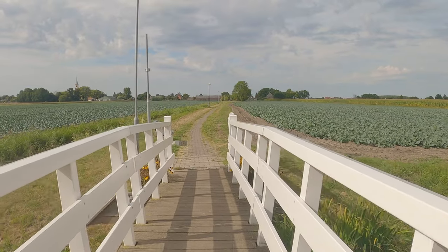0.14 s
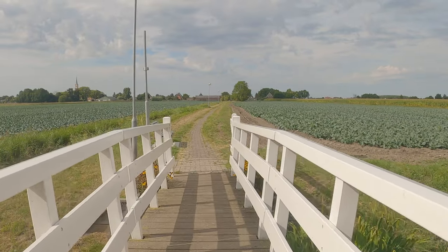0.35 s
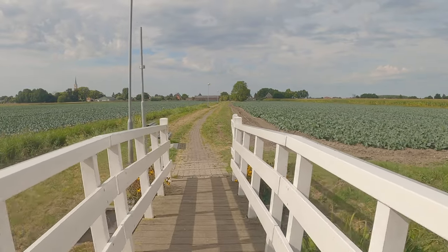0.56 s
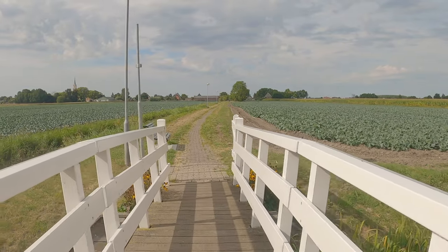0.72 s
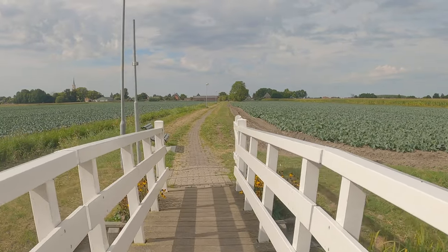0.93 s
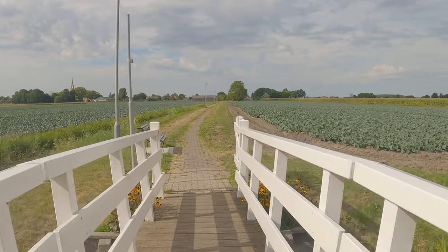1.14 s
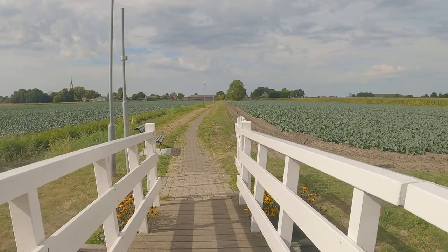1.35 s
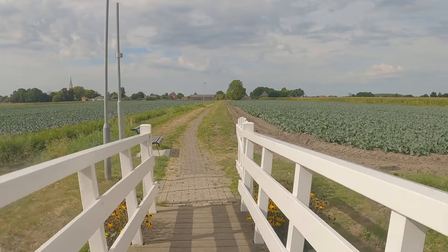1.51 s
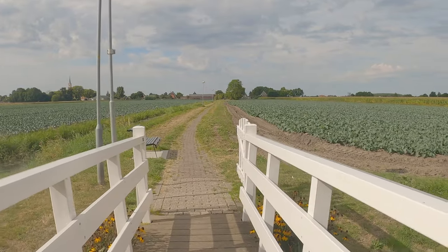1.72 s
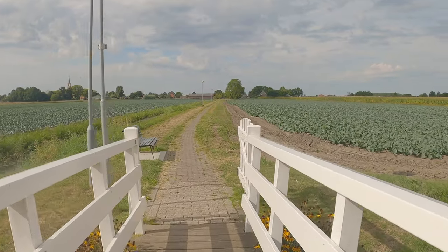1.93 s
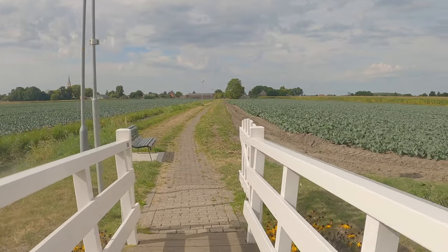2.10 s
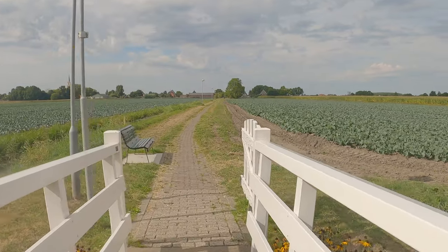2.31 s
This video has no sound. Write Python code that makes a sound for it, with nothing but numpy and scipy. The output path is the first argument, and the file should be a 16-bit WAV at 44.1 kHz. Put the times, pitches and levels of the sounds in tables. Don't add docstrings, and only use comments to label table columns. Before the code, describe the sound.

Close stereo microphone on a cyclist crossing a plank bridge in open country: tyres grind and crackle over loose boards, the freewheel clicks quickly, hard cracks and knocks break in, then the clicking slows slightly.

```python
import sys
import numpy as np
from scipy import signal
from scipy.fft import rfft, irfft
from scipy.io import wavfile
from scipy.ndimage import uniform_filter1d

SR = 44100
rng = np.random.default_rng(int(sys.argv[2]) if len(sys.argv) > 2 else 0)


def unload_audio(sound):
    columns = np.transpose(np.atleast_2d(sound))
    steps = np.round(np.clip(columns, -1, 1) * 32767)
    wavfile.write(sys.argv[1], SR, steps.astype(np.int16))


def boost(x):
    u = np.asarray(x, float) / 20
    return 10 ** u


N = 104252
HZ = np.fft.rfftfreq(N, 1 / SR)

# t/s, level/dB
PAWL_TICKS = [(0.0536, -45), (0.1468, -52), (0.2394, -47.5), (0.3307, -48), (0.4175, -41), (0.5032, -39),
              (0.5885, -45), (0.6395, -44), (0.685, -43), (0.7095, -45), (0.7287, -56), (0.7751, -42),
              (0.814, -44), (0.8648, -44.5), (0.927, -44.5), (0.9912, -67), (1.0106, -42.5), (1.068, -49),
              (1.0855, -42.5), (1.1533, -43), (1.1752, -47),
              (1.2173, -43), (1.279, -44), (1.291, -45), (1.329, -39.5), (1.3912, -37.5), (1.455, -42),
              (1.5096, -49), (1.565, -44), (1.605, -44), (1.6485, -42), (1.6912, -41.5), (1.7505, -41),
              (1.8191, -44.5), (1.8982, -44.5), (1.9709, -42), (2.0639, -42.5), (2.151, -46.5),
              (2.248, -43), (2.345, -43.5)]
# f/Hz, level/dB, t60/s
HUB_MODES = [(2430, -4, .018), (2950, -1, .02), (4050, -10, .012), (5250, -12, .012), (6500, -13, .012),
             (7650, -9, .016), (9570, -3, .026), (11200, -21, .01), (12600, -20, .01), (14400, -19, .014)]

# t/s, level/dB, thump/dB, ring length (0-1)
PLANK_KNOCKS = [(0.036, -32, 8, 1), (0.111, -33, 11, 0.7), (.126, -35.5, 23, 0.2), (0.397, -55, 5, 0.8),
                (0.5030, -27, 20.5, 1), (.521, -31.5, 7, .9), (.553, -30, -17, 0.74),
                (0.5912, -29.5, 12, 0.57), (0.633, -35, 6, 0.6), (0.729, -27.5, -6, 0.74),
                (0.902, -35, 5, 0.77), (.935, -33, 3, 0.69), (1.075, -31, -7, 0.66),
                (1.268, -27.5, -18, 0.52), (1.321, -28, -19, 0.9), (1.384, -31, -10, 0.94),
                (1.625, -22.5, 1.5, 0.6), (1.684, -41, 2, 0.9), (1.693, -29.5, 1, 1),
                (1.721, -28.5, -24, 0.5), (1.781, -30.5, -18, 0.76), (1.89, -31, -8, 1),
                (1.902, -31, 6, 0.95), (1.97, -32.5, 4, 1), (2.004, -40.5, 23, .8),
                (2.3250, -25.5, -15, 0.8)]
# f/Hz, level/dB, t60/s
PLANK_MODES = [(420, -6.5, 0.005), (527, -23, 0.019), (623, -10.5, 0.044), (1136, 0, 0.034),
               (1160, -5, 0.036), (1680, -2, 0.049), (1830, -4.5, 0.05), (2397, -8.5, 0.045),
               (2950, -0.5, 0.036), (4060, -16, 0.069), (6700, -15.5, .008)]

# t/s, level/dB, f/Hz, brightness per step up/dB
GRIT_SNAPS = [(0.0225, -35, 3220, 2), (0.0365, -23.5, 2580, -4), (.1057, -39, 3140, -5),
              (.115, -34, 3860, -5), (.1246, -31, 3720, -9), (.1525, -31, 2900, -18),
              (.179, -42.5, 5950, -3), (0.2179, -36.5, 3270, -8), (.2404, -31, 3320, -3),
              (0.2843, -40.5, 3300, -14), (.294, -48, 6900, 2), (0.3290, -30, 2900, -15),
              (.375, -44.5, 6370, -12), (.4725, -42, 2800, -2), (0.482, -37, 5260, -6),
              (0.5025, -17, 2590, -28), (0.5334, -30, 3000, -7.5), (0.5539, -35, 2900, -10),
              (0.5927, -16.5, 4400, -24), (.5975, -44, 4200, -6), (.686, -52, 3250, -10),
              (0.728, -24, 3460, -1.5), (.865, -38, 2940, -22), (0.8999, -33.5, 2510, -2.5),
              (0.9912, -30, 4980, -20), (1.2345, -34.5, 3560, -5), (1.268, -30, 2880, -5.5),
              (1.4194, -34, 4770, -11), (1.441, -33, 3400, -8), (1.5015, -35.5, 3140, -9),
              (1.5092, -26, 2640, 1), (1.6067, -35, 2650, -10), (1.6462, -30.5, 2730, -5),
              (1.6896, -27, 2580, -5), (1.7215, -30.5, 3300, -9), (1.819, -36, 3000, -25),
              (1.8444, -31.5, 2750, -0.5), (1.8926, -30, 2700, -2), (1.9194, -21, 3100, -4),
              (1.9717, -26, 2800, -19), (1.993, -39, 4530, -4), (2.0362, -34.5, 2670, -9),
              (2.1487, -30, 3020, -17), (2.2012, -39, 2700, -1), (2.2698, -43.5, 5240, -9),
              (2.3050, -53, 4500, -6), (2.3250, -25, 4220, -5.5), (2.336, -44, 4840, -15),
              (2.346, -35, 2720, -15)]
SNAP_T60_S, SNAP_SPREAD = .011, .28

LONGEST_T60_S, SCUFF_S, FUZZ_TOP_DB = .03, .002, -9

# grain sizes, f/Hz, level/dB
GRAIN_SIZES = [(1100, 0), (2700, -1.5), (4500, -9), (7500, -16)]
# t/s, spread/s, extra grains (times the usual rate)
GRIT_SCRAPES = [
    (0.125, 0.031, 13.7),
    (0.641, 0.012, 4.3),
    (0.722, 0.015, 7.1),
    (0.917, 0.0063, 2.4),
    (1.154, 0.026, 8.2),
    (1.43, 0.014, 5.2),
    (1.66, 0.017, 3.3),
    (1.986, 0.018, 9),
]
GRIT_PER_S, GRIT_DB, GRIT_SCATTER_DB, GRAIN_S = 260, -57.5, 1.3, .0015

# f/Hz, density/dB per Hz
ROLL_SPECTRUM = [(88, -10), (150, 2), (612, -14), (1030, -16.5), (2270, -13.5), (3030, -18.5),
                 (4720, -28.5), (9630, -33.5), (15000, -38)]
# f/Hz, width/Hz, level/dB
ROLL_RESONANCES = [(1122, 420, 11.5), (2900, 640, 2.5)]
# t/s, level/dB
TREAD_LOAD = [
    (0.0, -53),
    (0.31, -54.5),
    (1.86, -54),
    (2.04, -53.5),
    (2.36, -57.5),
]
# t/s, level/dB
LOOSE_BOARDS = [
    (0, 5),
    (.35, 2.5),
    (.95, 0.5),
    (1.3, -0.5),
    (1.7, -1.5),
    (2.36, 3),
]
HOLLOW_TOP_HZ = 620

# f/Hz, density/dB per Hz
RUMBLE_SPECTRUM = [(8.8, -71), (15, -6.5), (38, 2.5), (76, -4), (107, -11), (145, -18.5), (252, -33.5),
                   (300, -21.5), (390, -76), (660, -120)]
# t/s, level/dB
DECK_SHAKE = [(0.0, -45.5), (0.08, -36), (0.68, -43), (0.72, -33), (0.77, -53.5), (0.83, -36.5),
              (0.87, -42), (1.33, -37), (1.36, -49), (1.56, -33), (1.58, -44.5), (1.74, -33), (1.82, -48.5),
              (1.86, -31.5), (1.97, -43), (2.02, -32), (2.06, -38), (2.36, -41)]
# t/s, level/dB
DECK_NOTE = [(0.0, -49), (0.03, -49.5), (0.29, -42.5), (0.44, -54), (0.48, -38), (0.53, -53), (0.63, -40),
             (1.22, -47), (1.28, -69), (1.41, -34.5), (1.45, -56), (1.54, -41), (2.16, -46), (2.17, -58),
             (2.23, -39), (2.27, -66), (2.32, -34), (2.36, -40.5)]
DECK_HZ, DECK_WIDTH_HZ, DECK_DB, SHAKE_DB = 106.4, 8.7, 1, 2.5

# f/Hz, left minus right/dB
PORT_LEAN = [(30, 3), (150, -.5), (600, 2), (1500, 3.8), (3000, 3), (5000, .5), (12000, .5)]
# f/Hz, left leads/rad
PORT_LEAD = [(300, 0), (1400, -.4), (2000, -.7), (4000, -.5), (7000, -.1), (9500, 1.7), (11000, 3)]
# f/Hz, share (0-1)
PORT_WIDTH = [(30, .44), (120, .32), (1000, .34), (4000, .3), (9000, .7)]
RAIL_ECHO_S, RAIL_DB = 0.013, -10
MIC_TOP_HZ = 12100


def freewheel():
    ticks = strike(PAWL_TICKS, lambda tick: HUB_MODES, push_s=.001, scatter_db=2.0,
                   detune=.004, fuzz_db=0, fuzz_s=.0045, lead_db=-8)
    return boost(9) * ticks


def planks():
    def modes(knock):
        return [(f, db + knock[2] * (f < 800), t60) for f, db, t60 in PLANK_MODES]

    def ring_length(knock):
        return np.clip(knock[3], .2, 1.2)

    knocks = strike(PLANK_KNOCKS, modes, push_s=.0006, scatter_db=1.5, detune=.03,
                    fuzz_db=0, fuzz_s=.005, lead_db=-26, lasts=ring_length)
    return boost(1) * knocks


def snaps():
    def cluster(snap):
        modes = []
        for k in range(-3, 9):
            f = snap[2] * (1 + SNAP_SPREAD) ** (k / 2)
            db = -7.0 * max(-k, 0) + snap[3] / 2 * max(k - 1, 0)
            modes.append((f, db, SNAP_T60_S / (1 + .25 * abs(k))))
        return modes

    def crumble(snap):
        return np.clip(1 - (snap[1] + 18) / 14, .9, 2)

    cracks = strike(GRIT_SNAPS, cluster, push_s=.0003, scatter_db=1.0, detune=.03,
                    fuzz_db=-2, fuzz_s=.002, lead_db=-15, lasts=crumble)
    return boost(-1) * cracks


def strike(rows, modes, push_s, scatter_db, detune, fuzz_db, fuzz_s, lead_db, lasts=lambda row: 1):
    out, t = np.zeros((2, N + 2048)), np.arange(2048) / SR
    bins = np.fft.rfftfreq(len(t), 1 / SR)
    s = t - SCUFF_S * 4
    late = np.maximum(s, 0)
    lead = boost(lead_db)
    for row in rows:
        length = lasts(row)
        push = push_s * length
        table = np.array(modes(row), float)
        hz, db, t60 = table.T[:, :, None]
        r = rng.standard_normal((3, len(hz), 1))
        noise = rng.standard_normal((3, len(t)))

        turn = 2 * np.pi * np.clip(hz * (1 + detune * r[1]), 50, .45 * SR) * t
        decay = np.exp(-np.log(1000) * t / np.minimum(t60, LONGEST_T60_S) / length)
        ring = decay * np.sin([turn, turn + 3 * r[2]])
        rung = rfft(ring) * rfft(noise[0] * late * np.exp(-late / push))
        rung = rung / np.sqrt((np.abs(rung) ** 2).sum(-1, keepdims=True)) * boost(db + scatter_db * r[0])

        edge = np.minimum(bins / table[0, 0], 1) ** 4 * np.minimum(table[-1, 0] / (bins + 1), 1) ** 3
        swell = np.where(s < 0, lead * np.exp(s / SCUFF_S), 1 - (1 - lead) * np.exp(-late / push))
        fuzz = rfft(noise[1:] * swell * np.exp(-late / fuzz_s / length))
        fuzz = fuzz * boost(np.minimum(on_hz(table, bins), FUZZ_TOP_DB)) * edge
        fuzz = fuzz / np.sqrt((np.abs(fuzz) ** 2).sum(-1, keepdims=True))

        blow = irfft(rung.sum(1) * edge + boost(fuzz_db) * fuzz)
        i = int((row[0] - SCUFF_S * 4) * SR)
        out[:, i:i + len(t)] += blow * boost(row[1]) / np.abs(blow[0]).max()
    return out[:, :N]


def grit():
    t = np.arange(N) / SR
    dense = 1 + sum(more * np.exp(-.5 * ((t - s) / spread) ** 2) for s, spread, more in GRIT_SCRAPES)
    for s, db, *_ in PLANK_KNOCKS:
        dense = dense + 3 * boost(db + 29.5) * (t > s) * np.exp(-np.abs(t - s) / .025)
    hit = rng.random(N) < GRIT_PER_S * dense * boost(4 * walk(25)) / SR
    size_db = np.minimum(GRIT_SCATTER_DB * rng.exponential(size=N), 14)
    pops = hit * boost(size_db)
    kind = rng.integers(0, 4, N)
    out = 0
    for k, (f, db) in enumerate(GRAIN_SIZES):
        puffs = signal.lfilter([1], [1, -np.exp(-1 / (GRAIN_S * SR))], pops * (kind == k))
        puffs = puffs * rng.standard_normal((2, N))
        colour = 1 + (np.log2((HZ + 1) / f) / 0.78) ** 4
        out = out + boost(db) * np.sqrt(dense) ** 0.21 * unit(irfft(rfft(puffs) / colour, N))
    return boost(GRIT_DB) * out


def roll():
    db = on_hz(ROLL_SPECTRUM, HZ)
    for f, width, peak_db in ROLL_RESONANCES:
        db = db + 20 * np.log10(1 + (boost(peak_db) - 1) / (1 + (2 * (HZ - f) / width) ** 2))
    tread = bands(db, 146.0, count=14, swell_db=1.9 * walk(40.3), flicker_db=2.5, rate=30)
    low = irfft(rfft(tread) / (1 + (HZ / HOLLOW_TOP_HZ) ** 6), N)
    hollow = (boost(on_time(LOOSE_BOARDS)) - 1) * low
    return (tread + hollow) * boost(on_time(TREAD_LOAD) + 4.5)


def rumble():
    low = bands(on_hz(RUMBLE_SPECTRUM, HZ), 14.4, count=9, swell_db=0, flicker_db=1.0, rate=8.37)
    resonance = 1 + (2 * (HZ - DECK_HZ) / DECK_WIDTH_HZ) ** 2
    note = irfft(rfft(rng.standard_normal((2, N))) / resonance, N)
    shaking = steady(low, 0.071) * boost(on_time(DECK_SHAKE) + SHAKE_DB)
    return shaking + steady(note, 0.046) * boost(on_time(DECK_NOTE) + DECK_DB)


def bands(table, lo_hz, count, swell_db, flicker_db, rate):
    out = np.zeros((2, N))
    for k in range(count):
        tent = np.clip(1 - np.abs(2 * np.log2(np.maximum(HZ, 1) / lo_hz) - k), 0, 1) ** .5
        noise = irfft(rfft(rng.standard_normal((2, N))) * tent * boost(table), N)
        out += noise * boost(swell_db + flicker_db * walk(rate))
    return unit(out)


def steady(x, span_s):
    return x / np.sqrt(uniform_filter1d(x ** 2, int(span_s * SR), axis=-1))


def walk(rate):
    k = int(SR / rate)
    steps = np.repeat(rng.standard_normal(N // k + 1), k)
    return unit(uniform_filter1d(uniform_filter1d(steps, k), k)[:N])


def unit(x):
    return x / np.sqrt(np.mean(x ** 2))


def on_hz(table, hz):
    t = np.array(table, float)
    return np.interp(np.log(np.maximum(hz, 1)), np.log(np.maximum(t[:, 0], 1)), t[:, 1])


def on_time(table):
    return np.interp(np.arange(N) / SR, *np.array(table, float).T)


def rails(hits):
    t = np.arange(4096) / SR
    scatter = unit(rng.standard_normal((2, len(t)))) * np.exp(-t / RAIL_ECHO_S) / np.sqrt(RAIL_ECHO_S * SR)
    return signal.fftconvolve(hits, scatter, axes=1)[:, :N] * boost(RAIL_DB)


def ports(shared, differing):
    wide = np.clip(on_hz(PORT_WIDTH, HZ), 0, 1)
    tilt = boost(on_hz(PORT_LEAN, HZ) / 2) * np.exp(.5j * on_hz(PORT_LEAD, HZ))
    mid = rfft(shared) * np.sqrt(1 - wide ** 2)
    side = rfft(differing) * wide
    return irfft(np.array([(mid + side) * tilt, (mid - side) / tilt]), N)


def scene():
    hits = freewheel() + planks() + snaps()
    return ports(*(hits + rails(hits) + grit() + roll() + rumble()))


def roll_off(x):
    return signal.sosfilt(signal.butter(12, 16090, fs=SR, output="sos"), x)


def record(dry):
    dull = signal.butter(4, min(MIC_TOP_HZ, .45 * SR), fs=SR, output="sos")
    return roll_off(signal.sosfilt(dull, dry))


dry = scene()
out = record(dry)
unload_audio(out)
```